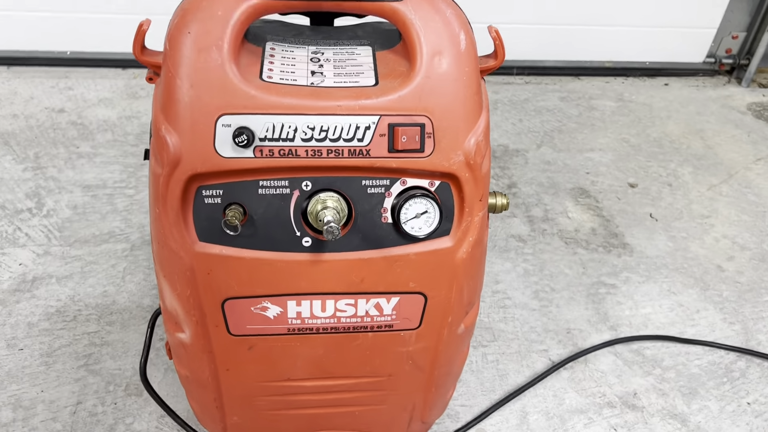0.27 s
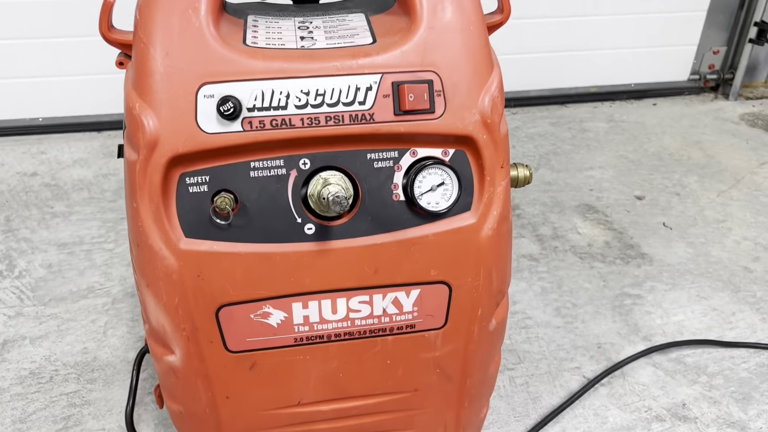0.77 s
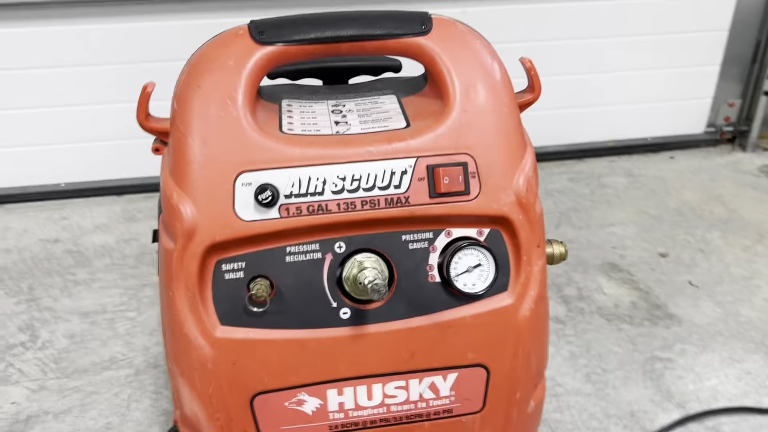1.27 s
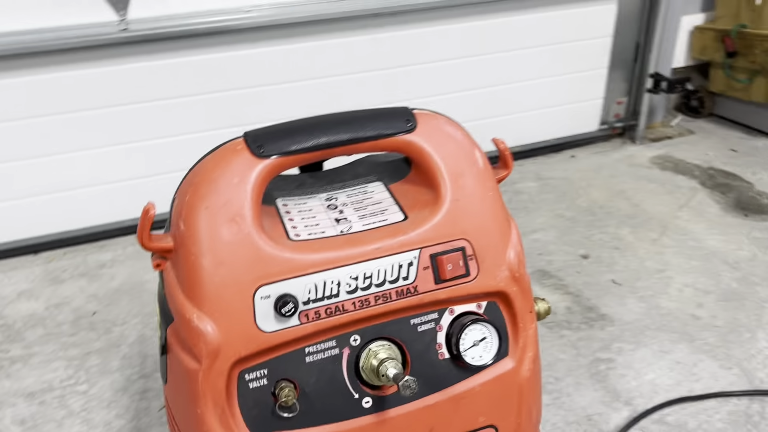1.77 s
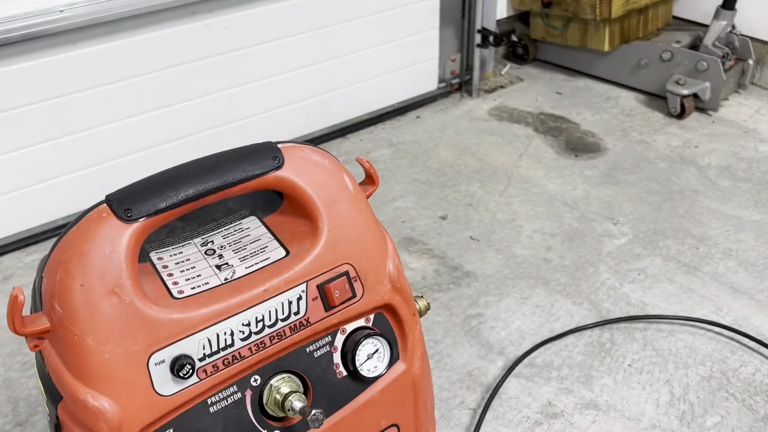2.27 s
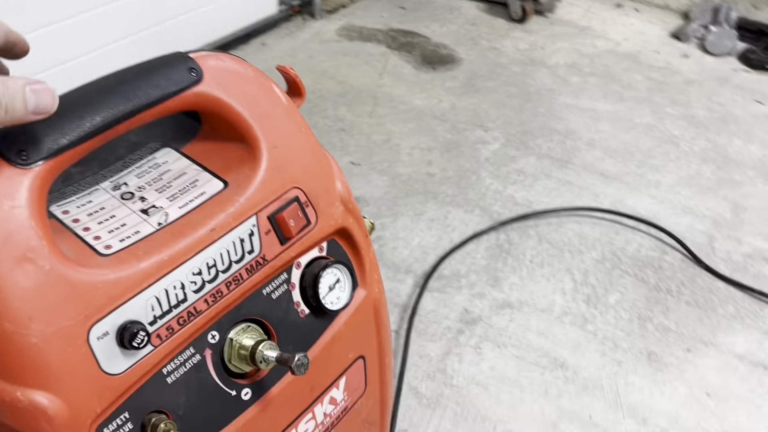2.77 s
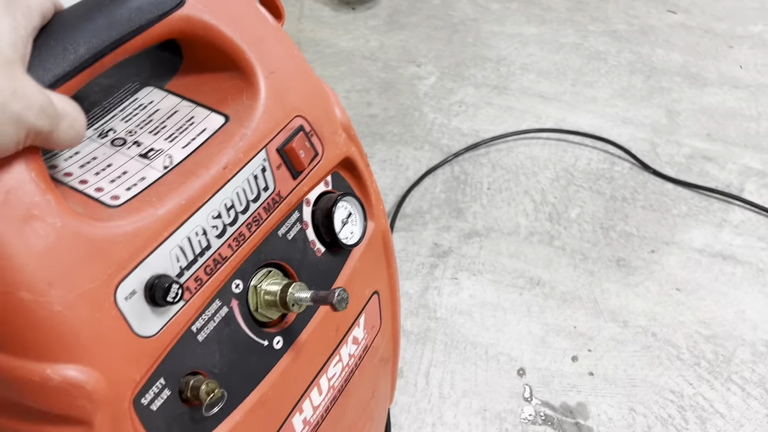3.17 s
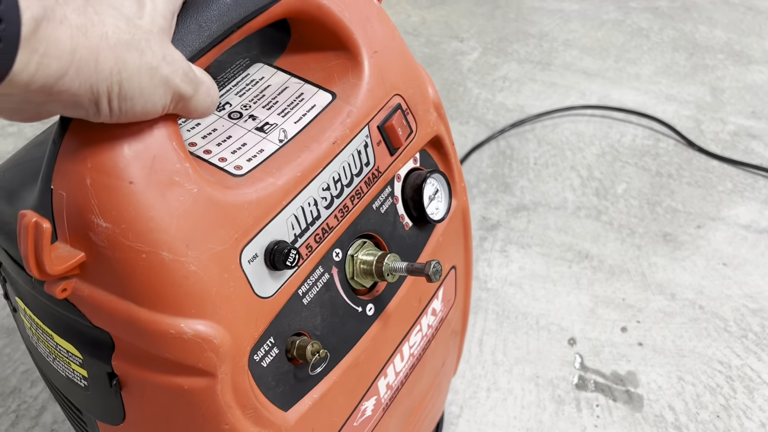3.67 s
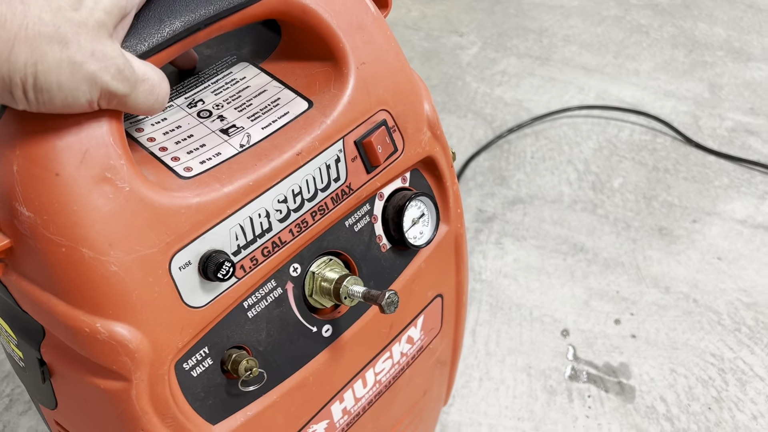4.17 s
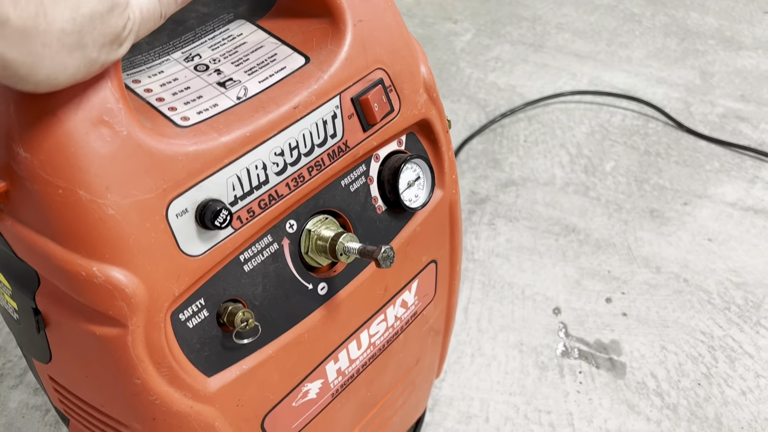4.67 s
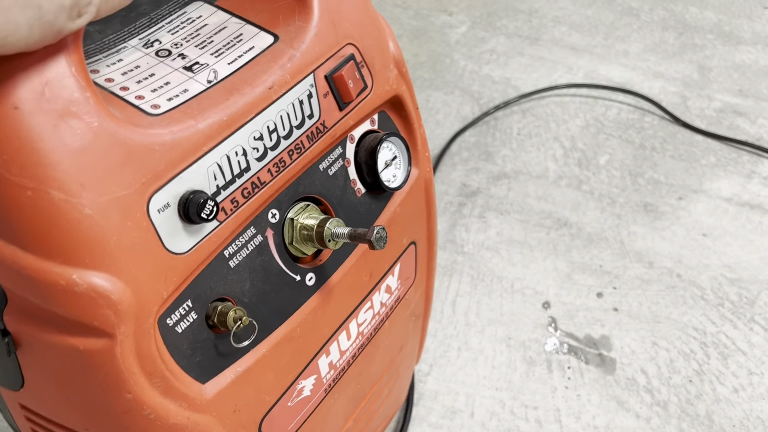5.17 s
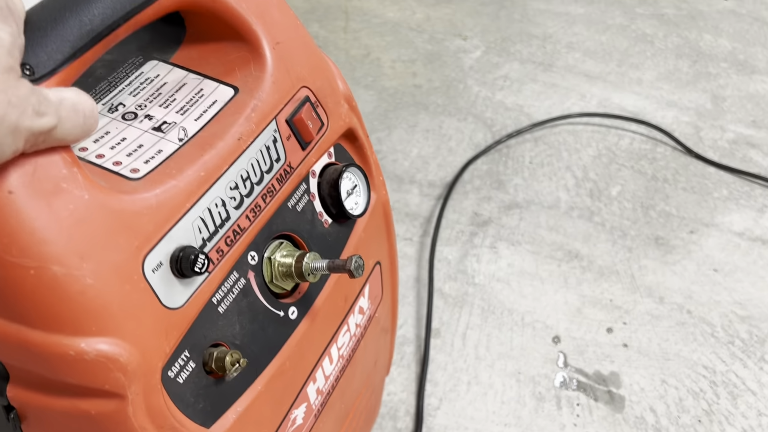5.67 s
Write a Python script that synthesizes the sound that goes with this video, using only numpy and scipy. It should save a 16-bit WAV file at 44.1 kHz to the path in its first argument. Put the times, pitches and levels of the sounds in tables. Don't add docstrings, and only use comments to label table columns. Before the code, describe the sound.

A small piston air compressor runs steadily in a garage, a loud rattling, buzzing drone that slowly sinks in pitch.

```python
import sys
import numpy as np
from scipy import signal
from scipy.io import wavfile
from scipy.ndimage import uniform_filter1d

SR = 44100
rng = np.random.default_rng(int(sys.argv[2]) if len(sys.argv) > 2 else 0)


def decibels_to_gain(level_db):
    exponent = np.asarray(level_db, float) / 20
    return 10 ** exponent


def pcm_store(signal):
    levels = np.round(np.clip(np.atleast_2d(signal), -1, 1) * 32767)
    wavfile.write(sys.argv[1], SR, levels.astype(np.int16).T)


N = 261513
HOP = 256
FRAMES = N // HOP + 5

# time in seconds, speed in turns per second.
CRANK_SPEED = [(0.0, 37.395), (0.4, 37.21), (0.79, 36.962), (1.98, 35.908), (2.77, 35.321), (3.56, 34.728),
               (4.74, 34.011), (5.53, 33.709), (5.93, 33.643)]
# time in seconds, turn from 0 in front to 1 at the side, nearness in dB.
MICROPHONE_PATH = [
    (0, 0.1, -0.5),
    (.6, 0, .5),
    (.9, 0.038, 0),
    (1.6, 0.3, -1.5),
    (2.2, 0.76, -1),
    (2.7, 1, 0.5),
    (3.3, 0.87, 0.5),
    (4.7, 0.88, -0.5),
    (5.93, 1, -.5),
]
CRANK_DB = [-43.5, -32.0, -27.5, -32.5, -20.0, -32.5, -34, -26.0, -30.5, -33.5, -38.5, -37, -54.5, -44.5,
            -37.5, -45, -40.5, -43.5, -40, -35, -35.5, -33.5, -32.5, -34, -40.5, -37.5, -43.5, -44.5, -42.5,
            -48.5]
SHAFT_ORDERS = [3.5, 4.5, 5.5, 6.5, 13.5, 22.5]
# rms level in front in dB, change at the side in dB.
SHAFT_LEVELS = [(-42, -3.5), (-28, -1.1), (-30.5, -4), (-43.5, 7.5), (-50, 3.2), (-44, 9)]
# multiple of crank speed, mains shift in Hz.
WHINE_ORDERS = [(0, 120), (0, 240), (54, 0), (54, 120), (105, 0), (108, 0), (112.5, 0), (212, 0)]
# rms level in front in dB, change at the side in dB.
WHINE_LEVELS = [(-35.5, -0.5), (-45, -8), (-49.5, 5.5), (-54, 4.5), (-57, 8), (-48.5, 2), (-47, -3),
                (-50.5, -8)]
# frequency in Hz, density in dB per Hz.
BOOM_SPECTRUM = [(20, -38), (40, -21), (90, -20.5), (115, -15.5), (150, -18), (175, -2.5), (205, 1),
                 (240, -10.5), (300, -18.5), (400, -17), (600, -72)]
# frequency in Hz, density in dB per Hz.
RATTLE_SPECTRUM = [(150, -36), (300, 2), (350, 3.5), (450, -5), (800, -1), (1150, -7), (1300, -9.5),
                   (1700, -9.5), (1950, -20.5), (2400, -29.5), (3500, -47)]
# frequency in Hz,
# density in dB per Hz.
HISS_SPECTRUM = [(1200, -51), (2000, 0.5), (2450, 0), (2800, 0), (3500, -3), (5000, -1.5), (6500, -8.5),
                 (8750, -7.5), (9000, -12), (9700, -33), (10600, -23.5), (11200, -12.5), (15000, -8),
                 (15150, -22), (16000, -22)]
# frequency in Hz, width in Hz, gain in front in dB, change at the side in dB.
PANELS = [(973, 67, 5, -3), (1017, 50, .5, 4.5), (705, 32, 3, .5), (1350, 35, 8, .1), (1530, 41, 7, -.5),
          (1702, 99, 5.5, -1.5)]
# multiple of crank speed, width in Hz, gain in dB.
COMMUTATOR_BARS = [(106.6, 980, 4), (212, 980, 6.5), (315, 1750, 7.5)]
# frequency in Hz, width in Hz, gain in dB.
COOLING_SLOTS = [(2470, 105, -4.5), (2640, 150, 2), (3050, 120, 0.5), (3460, 98, -1.5), (4780, 180, 1.5),
                 (5050, 110, 1.5), (5450, 130, -3)]
# frequency in Hz, width in Hz, gain in
# dB.
CASING_MODES = [(148.9, 6.9, 9), (241.7, 5.0, 3.0), (335.8, 18.4, 7), (439, 7.4, 9.5), (490, 15.5, 10.5),
                (608.0, 48, 8.5), (678.0, 11, 5), (756, 14.0, 14), (842, 9.2, 5), (921.6, 59, 10),
                (992.5, 89, 11), (1027.5, 16, 9), (1370, 100, 11), (1514, 61, 10.5),
                (2050, 49, 3), (2018, 13, 8), (2123, 50, 10.5)]
# frequency in Hz, width in Hz, gain in dB.
DEAD_SPOTS = [(109.8, 11.5, -8.5), (206.7, 4.3, -18), (279.0, 14.8, -13.5), (313.3, 29.3, -18),
              (446.5, 11.6, -3), (545, 4.4, -6.5), (596, 7.3, -7.5), (749, 54, -12.5), (830, 44, -10),
              (900, 24, -19.5), (968, 10.6, -3), (1130, 41.0, -8), (1190, 15, -4.5), (1287, 40, -11)]
# frequency in Hz, change in dB.
SIDE_SHADOW = [(40, 1.8), (150, -3.5), (450, 1.5), (850, -5), (930, -6.5), (970, -13.5), (1030, -6.5),
               (1500, -6.5)]
# frequency in Hz, level in dB.
PORT_DIFFERENCE = [(30, -20), (92, -18), (170, -16), (330, -4.5), (600, -1), (900, -2), (1200, 0.5),
                   (1700, 5), (2600, -3), (3300, 2), (4000, -4), (5700, -0.5),
                   (6500, -1), (7300, -8.5), (8300, -3), (9000, 7), (10600, 15), (11300, 1.5), (12100, -3),
                   (12500, -14), (14200, -10), (14600, -5), (15000, -3), (15200, 7)]
# frequency in Hz,
# share.
IN_STEP = [(60, -0.45), (170, -0.42), (400, 0.08), (700, 0.23), (950, -0.24), (2000, -0.092), (3300, 0.5),
           (5500, 0.47), (9000, 0.034)]
# frequency in Hz, share.
QUARTER_AHEAD = [(100, 0.28), (340, -0.055), (520, -0.38), (1500, 0.88), (2100, -.1), (3300, .3), (6500, 0),
                 (8300, -.6), (9500, -.3), (11500, .75), (13000, 0), (15000, -.4)]
# time in seconds,
# length in seconds, frequency in Hz, width in Hz, gain over the steady noise in dB.
SHUFFLES = [(.35, .1, 55, 40, 6), (1.08, .05, 55, 60, 19), (1.786, .07, 70.4, 70, 15),
            (1.83, 0.15, 5600, 1200, 5), (5.31, 0.15, 510, 216, 11.5), (0.51, 0.21, 4000, 400, 5),
            (2.545, 0.25, 1620, 138.9, 8.5), (3.85, 0.17, 1460, 139, 10.5), (4.156, .15, 1306, 100, 14),
            (1.377, 0.75, 1580, 320, 5), (1.7, .5, 300, 70, -7), (3.5, .3, 950, 150, -6)]


def evened(x):
    return x / np.sqrt(np.mean(abs(x) ** 2) + 1e-20)


def read(points, hz):
    f, value = np.transpose(points)
    return np.interp(np.log(hz + 1), np.log(f + 1), value)


def curves(table, t):
    s, *columns = np.transpose(table)
    return [np.interp(t, s, c) for c in columns]


def crank_speed(t):
    return curves(CRANK_SPEED, t)[0]


def bump(x, centre, width):
    return np.exp(-((x - centre) / width) ** 2 * 2)


def resonances(modes, hz):
    return sum(db * bump(hz, f, width) for f, width, db in modes)


def heard_db(front_db, change_db, t, near_share=0.):
    turn, near_db = curves(MICROPHONE_PATH, t)
    return front_db + change_db * turn + near_share * near_db


def drift(count, size):
    z = rng.standard_normal((count, FRAMES, 2))
    for _ in range(2):
        z = uniform_filter1d(z, size, axis=1)
    return evened(z[..., 0] + 1j * z[..., 1])


def ports(mid, other, hz):
    tied = read(IN_STEP, hz) + 1j * read(QUARTER_AHEAD, hz)
    loose = np.sqrt(np.clip(1 - abs(tied) ** 2, 0, 1))
    return decibels_to_gain(read(PORT_DIFFERENCE, hz)) * (tied * mid + loose * other)


def moves(hz, t):
    return sum(db * bump(hz, f, width) * bump(t, s, length) for s, length, f, width, db in SHUFFLES)


def noise(hz, shape_db, level_db, patchy_db, streak_db):
    size = 2 * len(hz) - 2
    a, b, c, d, patch, streak = rng.standard_normal((FRAMES, len(hz), 6)).T
    streak = uniform_filter1d(streak, size=2, axis=0)
    streak = evened(uniform_filter1d(streak, size=50, axis=1))
    patch = uniform_filter1d(patch, size=8, axis=0)
    patch = evened(uniform_filter1d(patch, size=24, axis=1))
    gain = decibels_to_gain(shape_db + patchy_db * patch + streak_db * streak)
    gain = gain / np.sqrt((gain ** 2).sum(0).mean())
    gain = gain * decibels_to_gain(level_db) * np.sqrt(size / HOP / 6)
    mid = (a + 1j * b) * gain
    side = ports(mid, (c + 1j * d) * gain, hz)
    return signal.istft(np.array([mid, side]), nperseg=size, noverlap=size - HOP)[1][:, :N]


def casing():
    t = np.arange(FRAMES) * HOP / SR
    fine = np.fft.rfftfreq(16 * HOP, 1 / SR)[:, None]
    hz = np.fft.rfftfreq(4 * HOP, 1 / SR)[:, None]
    boom_db = heard_db(-24.5, -2.5, t, 3)
    rattle_db = heard_db(-21.5, -4.5, t, 0.6)
    brush_db = heard_db(-31, -3, t, 0)
    panels = sum(heard_db(db, change, t) * bump(hz, f, width) for f, width, db, change in PANELS)
    bars = sum(db * bump(hz, k * crank_speed(t), width) for k, width, db in COMMUTATOR_BARS)
    angle = 2 * np.pi * (np.cumsum(crank_speed(np.arange(N) / SR)) / SR - .3)

    boom_shape = read(BOOM_SPECTRUM, fine) + 0.56 * resonances(DEAD_SPOTS, fine) + moves(fine, t)
    boom = noise(fine, boom_shape, boom_db, patchy_db=2.6, streak_db=.6)
    rattle_shape = read(RATTLE_SPECTRUM, hz) + 0.16 * resonances(DEAD_SPOTS, hz) + panels + moves(hz, t)
    rattle = noise(hz, rattle_shape, rattle_db, patchy_db=1.7, streak_db=1.9)
    rattle = rattle * decibels_to_gain(0.2 * np.cos(angle) + 0.3 * np.cos(2 * angle))
    hiss_shape = read(HISS_SPECTRUM, hz) + bars + resonances(COOLING_SLOTS, hz) + moves(hz, t)
    hiss = noise(hz, hiss_shape, brush_db, patchy_db=0.56, streak_db=1.86)
    return boom + rattle + hiss * decibels_to_gain(0.35 * np.cos(angle))


def lines(rows, start, waver, size, ripple=0.):
    t, frame_t = np.arange(N) / SR, np.arange(FRAMES) * HOP / SR
    turns = np.cumsum(crank_speed(t)) / SR
    turns = turns + ripple * np.sin(2 * np.pi * turns)
    near, far = drift(len(rows), size), drift(len(rows), 2 * size)
    out = np.zeros((2, N))
    for (k, shift, front_db, change_db), turn, a, b in zip(rows, start, near, far):
        hz = k * crank_speed(frame_t) + shift
        room_db = resonances(CASING_MODES, hz) + resonances(DEAD_SPOTS, hz)
        line_db = heard_db(front_db, change_db + read(SIDE_SHADOW, hz), frame_t, 1)
        level = np.sqrt(2) * decibels_to_gain(line_db + room_db)
        level = level * np.exp(2j * waver * b.real)
        mid = level * (1 + waver * a) / np.sqrt(1 + waver ** 2)
        side = decibels_to_gain(-7) * ports(mid, level * b, k * 44.3 + shift)
        spin = np.exp(2j * np.pi * (k * turns + shift * t + turn))
        out += [(np.interp(t, frame_t, envelope) * spin).real for envelope in (mid, side)]
    return out


def motor():
    k = np.array(SHAFT_ORDERS)
    start = .15 + .11 * (k - 4.5) + (k - 4.5) ** 2 / 4
    shaft = lines(np.column_stack([k, 0 * k, SHAFT_LEVELS]), start, 0.083, size=20)
    rows = np.hstack([WHINE_ORDERS, WHINE_LEVELS])
    turn = rng.random(len(rows))
    mains = lines(rows[:2], turn[:2], 0.19, size=30)
    whine = lines(rows[2:], turn[2:], 0.58, size=10, ripple=0.0018)
    return shaft + mains + whine


def pump():
    chatter_db = -48 - 0.0564 * np.arange(15)
    levels_db = np.append(CRANK_DB, chatter_db)
    k = np.arange(len(levels_db)) + 1
    rows = np.column_stack([k, 0 * k, levels_db, 0 * k])
    scatter = rng.standard_normal(len(k))
    push = np.where(k < 4, .1 - .04 * k, -.07 * k + (k - 5) ** 2 / 4)
    snap = -.3 * k - .09 * (k % 2) + .04 * scatter
    start = np.where(k < 7, push, np.where(abs(k - 16) < 6, scatter, snap))
    low = lines(rows[:6], start[:6], .06, size=30)
    valves = lines(rows[6:30], start[6:30], .16, size=25)
    chatter = lines(rows[30:], start[30:], 0.54, size=25)
    return low + valves + chatter


def scene():
    mid, side = casing() + motor() + pump()
    return np.array([mid + side, mid - side])


def roll_off(x):
    return signal.sosfilt(signal.butter(12, 15690, fs=SR, output="sos"), x)


def record(dry):
    return roll_off(dry)


dry = scene()
out = record(dry)
pcm_store(out)
```